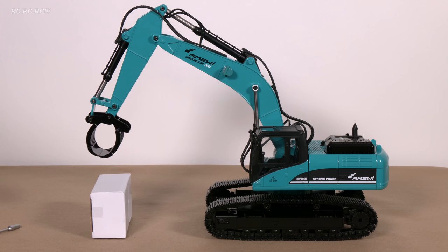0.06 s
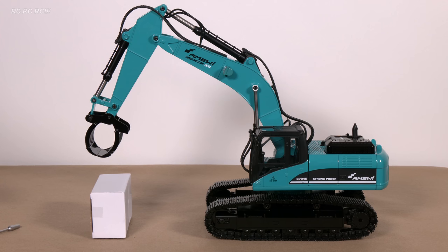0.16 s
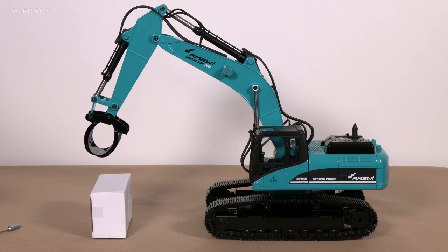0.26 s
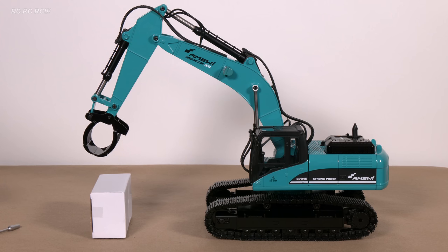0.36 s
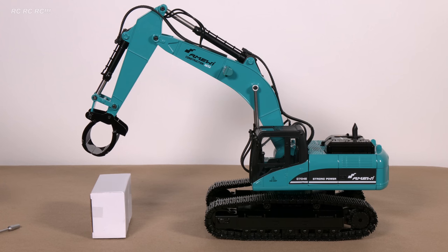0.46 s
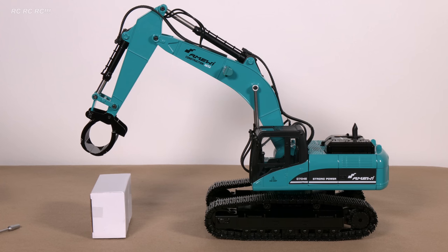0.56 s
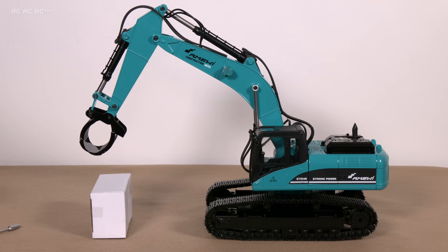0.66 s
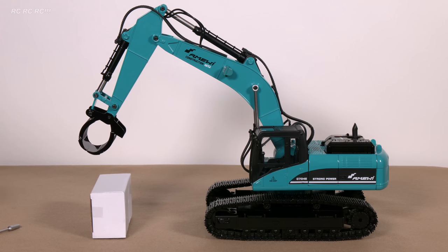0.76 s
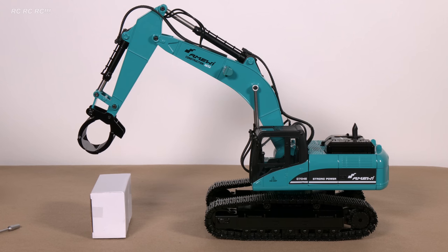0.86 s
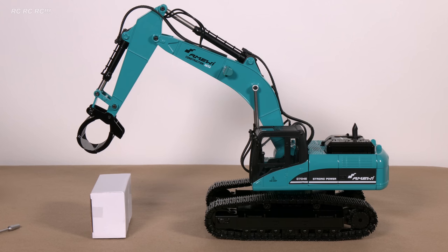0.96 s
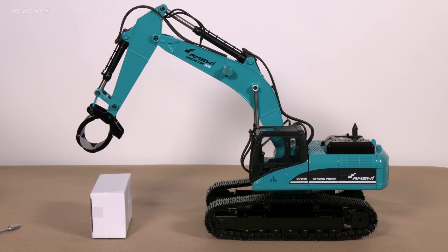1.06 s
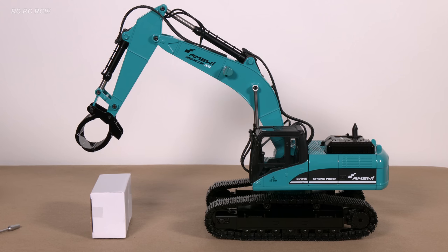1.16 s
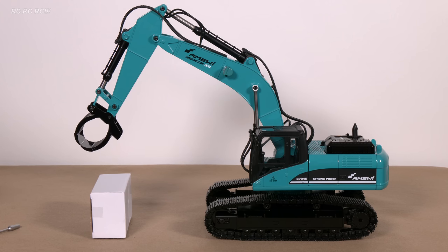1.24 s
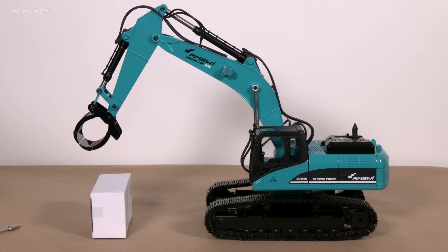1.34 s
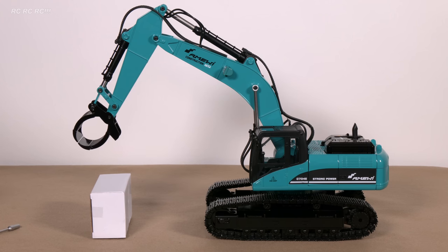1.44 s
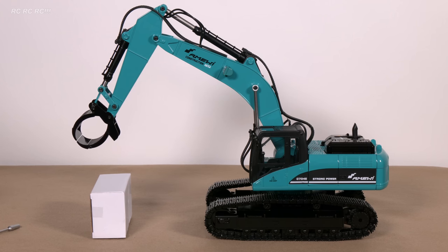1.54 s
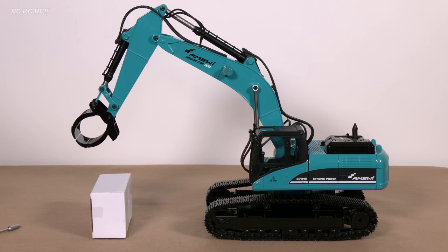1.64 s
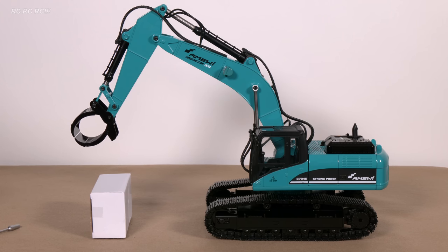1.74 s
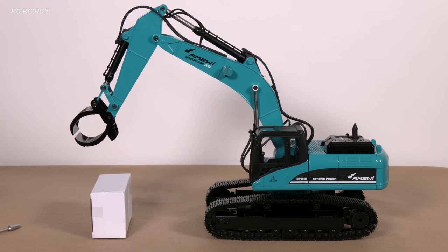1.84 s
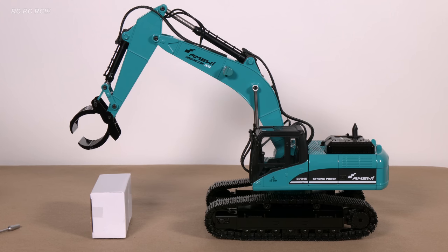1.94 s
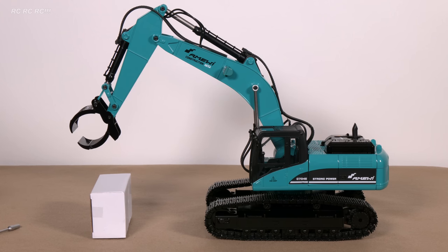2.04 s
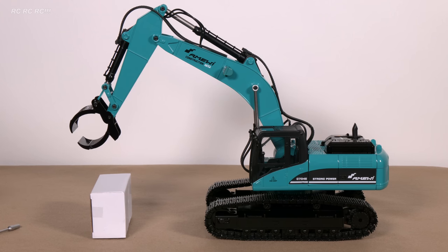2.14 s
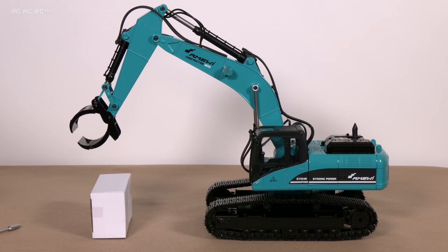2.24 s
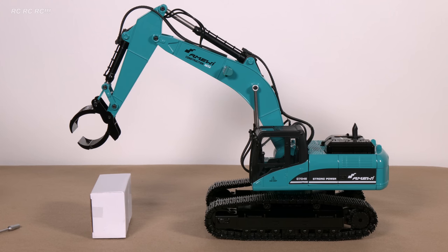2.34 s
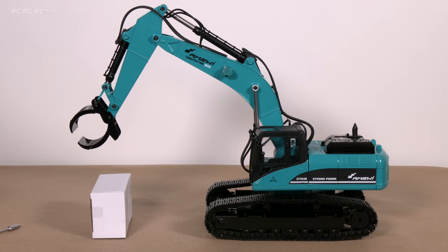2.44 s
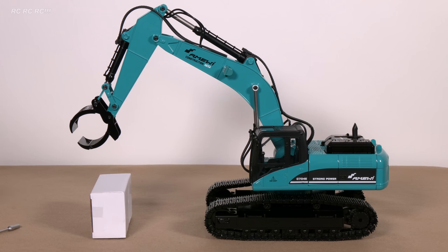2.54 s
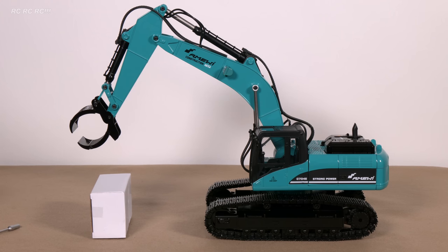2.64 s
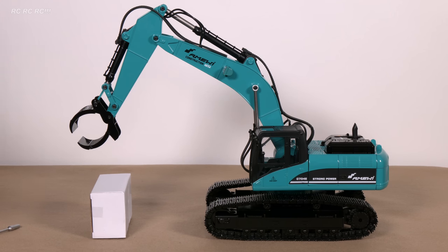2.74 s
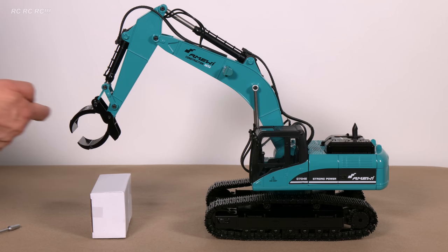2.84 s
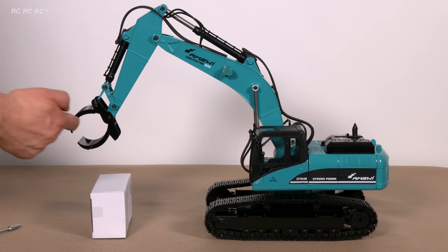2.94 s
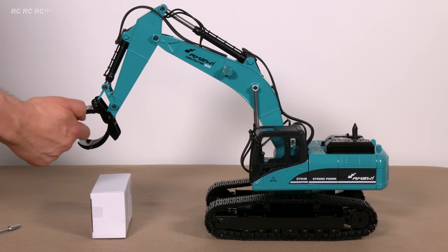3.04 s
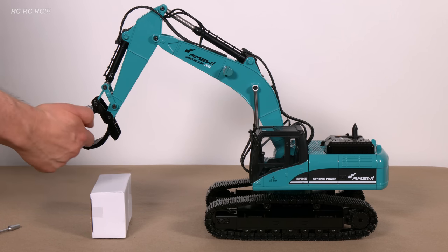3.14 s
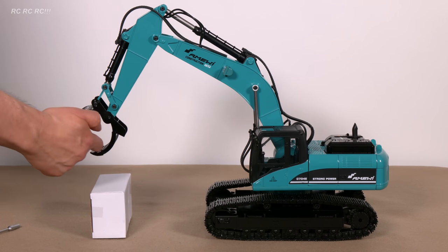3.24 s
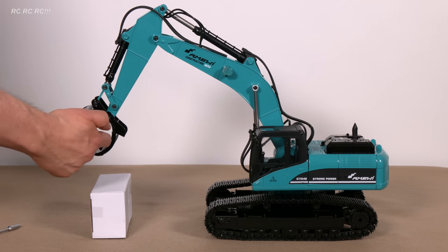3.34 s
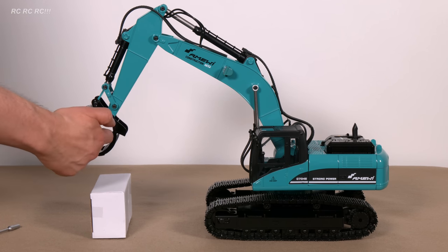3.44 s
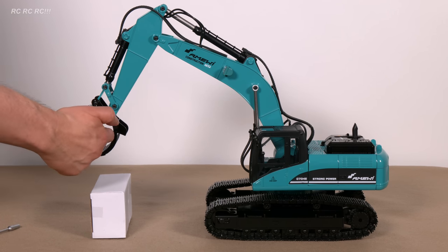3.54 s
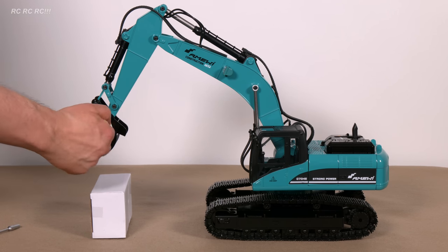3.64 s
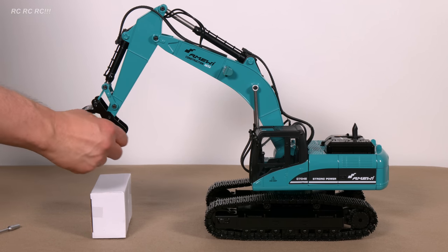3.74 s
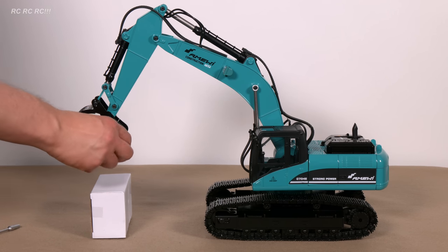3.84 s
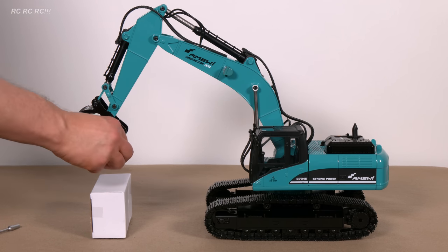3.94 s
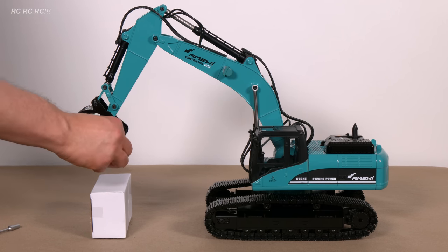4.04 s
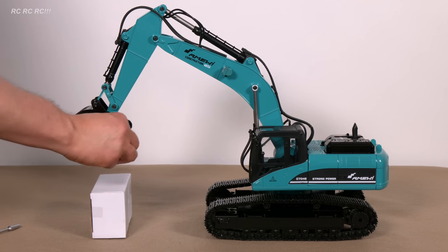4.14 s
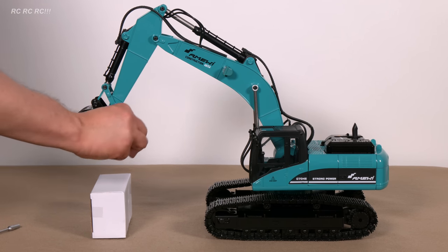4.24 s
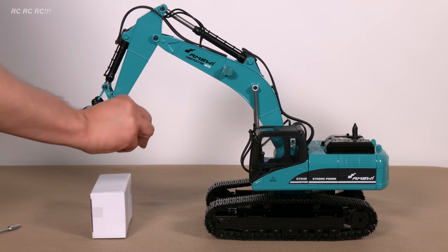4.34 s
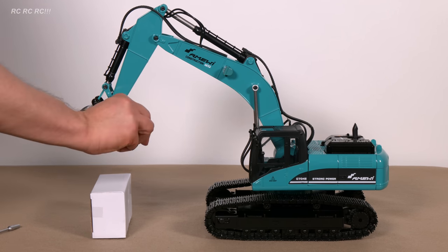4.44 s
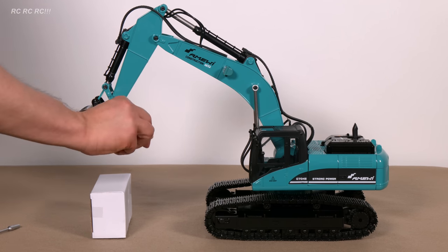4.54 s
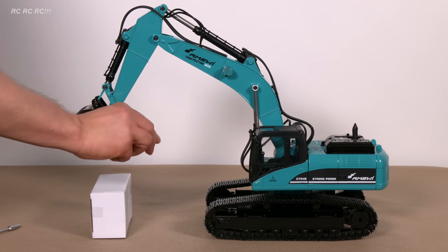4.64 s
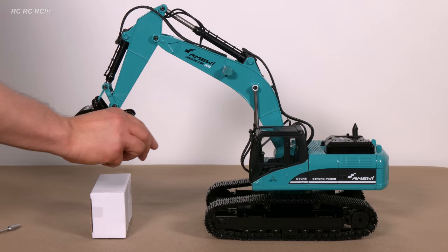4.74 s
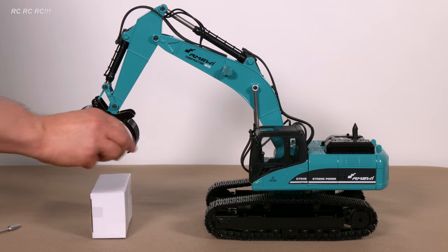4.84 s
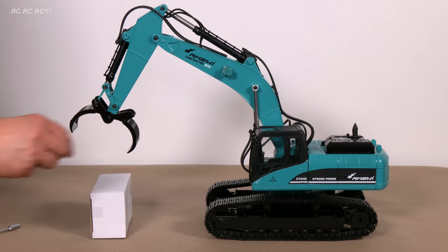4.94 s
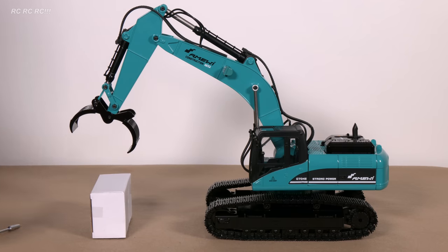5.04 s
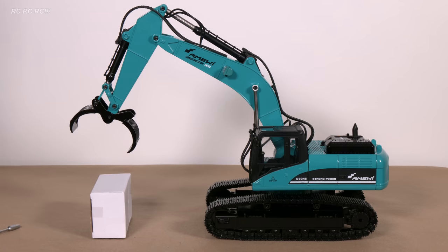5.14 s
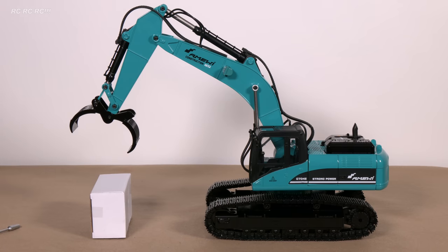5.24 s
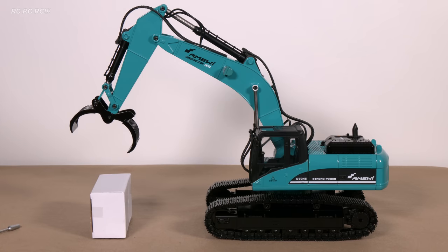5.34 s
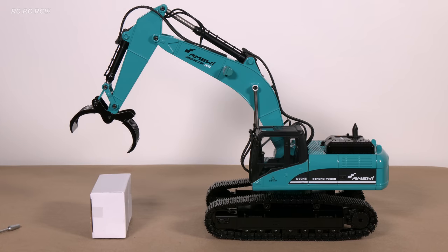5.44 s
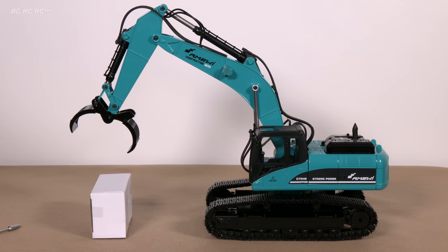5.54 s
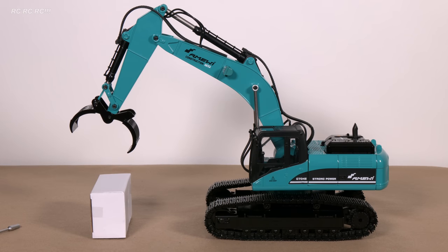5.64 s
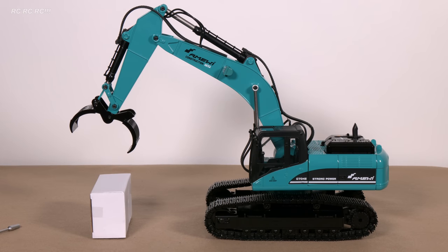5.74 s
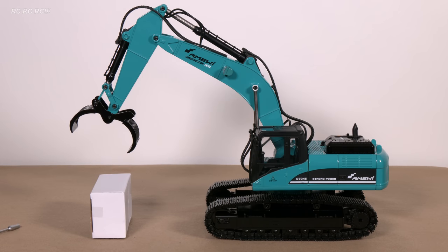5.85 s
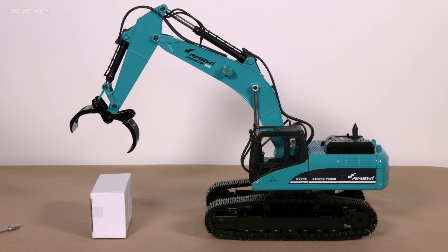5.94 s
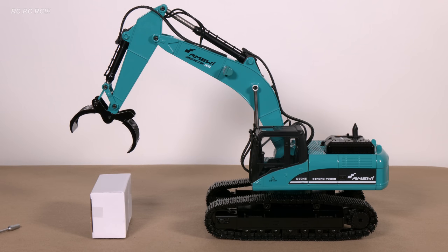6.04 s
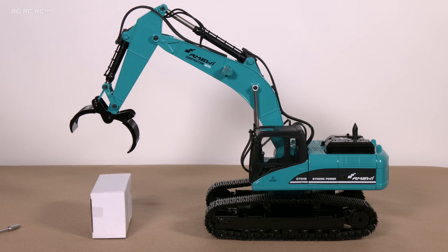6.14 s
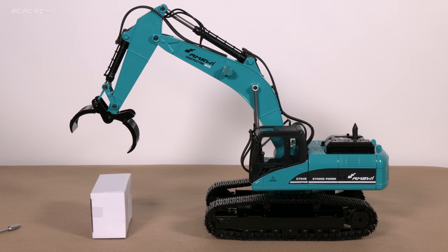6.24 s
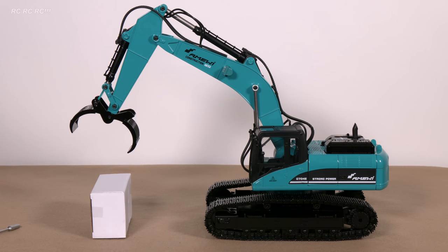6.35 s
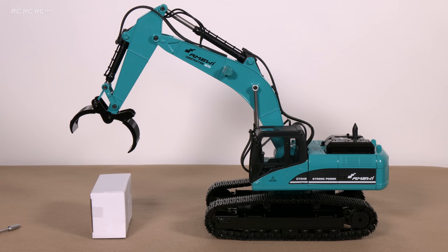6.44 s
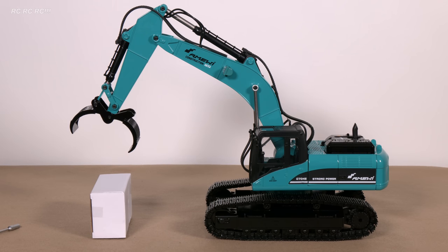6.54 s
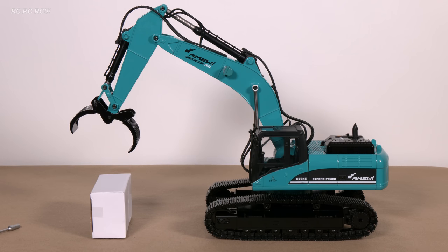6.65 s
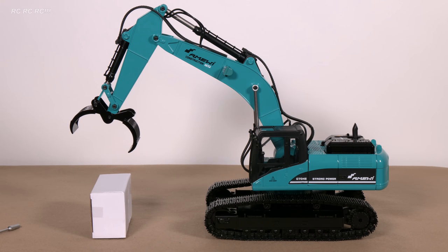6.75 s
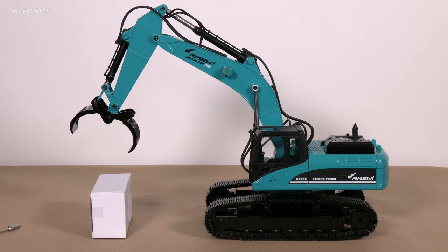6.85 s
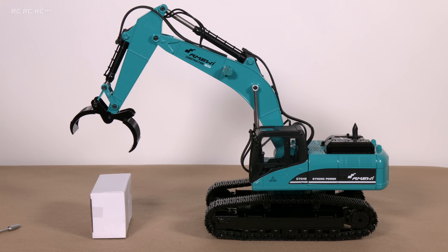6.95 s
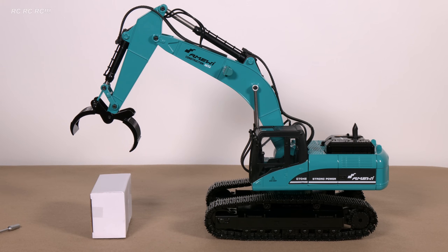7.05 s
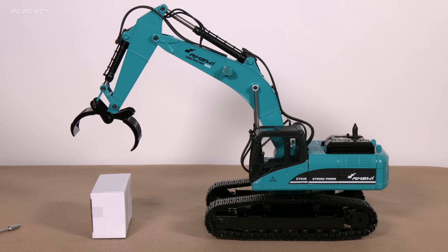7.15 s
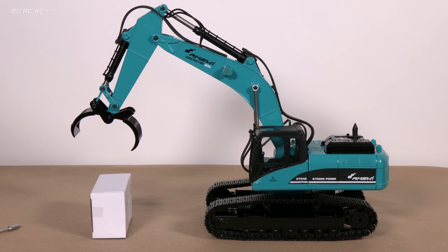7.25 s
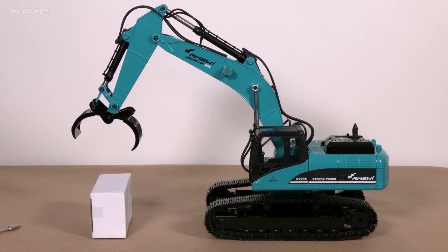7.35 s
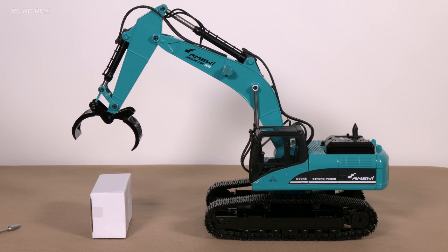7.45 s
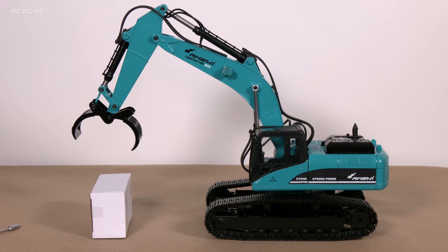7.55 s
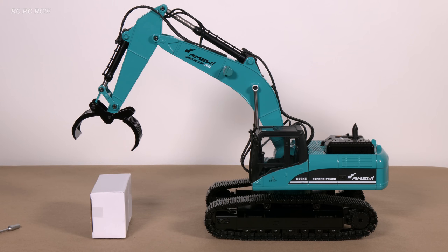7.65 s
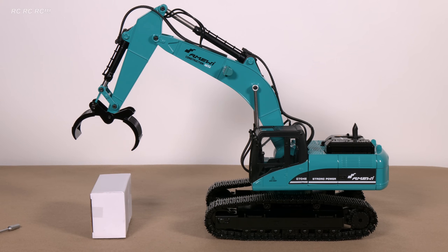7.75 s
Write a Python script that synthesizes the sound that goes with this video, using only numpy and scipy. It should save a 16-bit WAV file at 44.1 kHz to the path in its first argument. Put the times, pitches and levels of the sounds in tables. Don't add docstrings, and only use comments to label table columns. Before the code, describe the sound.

Toy excavator motor grinds for two seconds, a hand clicks its claw open with soft cloth rustle, then a faint buzz and short whirr.

```python
import sys
import numpy as np
from scipy import signal
from scipy.fft import rfft, irfft, next_fast_len
from scipy.io import wavfile
from scipy.ndimage import uniform_filter1d

SR = 44100
rng = np.random.default_rng(int(sys.argv[2]) if len(sys.argv) > 2 else 0)


def ratio_of_db(decibels):
    return 10 ** (np.asarray(decibels, float) / 20)


def persist_wave(psi):
    counts = np.round(np.clip(psi, -1, 1) * 32767).astype(np.int16)
    wavfile.write(sys.argv[1], SR, np.atleast_2d(counts).T)


N = 343539


def long_run():
    # on t/s, off t/s, first rattle level/dB, last rattle level/dB, spin-up t/s
    run = (-1, 2.05, -28.5, -28.5, .03)
    # t/s, f/Hz
    shaft = [(0, 309), (.5, 310.3), (1.1, 312), (2.06, 312.7), (2.16, 305)]
    # shaft level/dB at top speed, loss/(dB/Hz) below it, mesh whine level/dB, loss/(dB/Hz), extra coast fade
    tones_law = (-40, .7, -43, 1.9, -.25)
    teeth = [15, 18, 24, 28, 34, 35, 36, 38, 46, 48, 49, 50, 54, 58, 72, 73, 75, 80, 135, 220, 225, 240,
             245, 270, 315, 360, 365, 450, 495]
    teeth_db = [0, -19, -19, -17, -14, -14, -17, -9, -9, -6, -9, -9, -10, -13, -13, -13, -11, -12, 0, -8,
                -7, -6, -9, -9, -12, -12, -12, -17, -16]
    # f/Hz, level/dB per Hz
    colour = [(88, -59), (150, -43.5), (270, -17), (303, -17.5), (341, -13), (545, -14), (1020, -4.5),
              (1290, -11.5), (1530, -10), (2650, -12), (2810, -11), (3040, -8.5), (4580, -4.5), (8230, -9),
              (16000, -21.5)]
    # f/Hz, width/Hz, level/dB at the start, level/dB at the end
    rings = [(785, 55, 7, 7), (1000, 55, 9.5, 8), (1550, 110, 4.5, 8), (2660, 46, -6, 2),
             (3050, 140, -10, -8), (4570, 60, 7, 3), (4960, 100, 12, 1.5), (5140, 80, 1, -3),
             (5810, 260, 6.5, 4.5), (7530, 140, 4.5, 5.5), (8220, 250, 5.5, 8.5), (10800, 120, 3, 2)]
    return motor(run, shaft, tones_law, teeth, teeth_db, colour, rings,
                 swell_db=1.4, sizzle_db=.2, locked=0.46, throb=0.12, ticks_db=9.5,
                 waver_db=2.2, shake_hz=0.455, chatter_db=0.9)


def last_run():
    # on t/s, off t/s, first rattle level/dB, last rattle level/dB, spin-up t/s
    run = (6.96, 7.485, -32.5, -30.5, .022)
    # t/s, f/Hz
    shaft = [(6.955, 200), (7.08, 250), (7.16, 281), (7.24, 299), (7.3, 301), (7.36, 300.5), (7.4, 293),
             (7.48, 274), (7.57, 276)]
    # shaft level/dB at top speed, loss/(dB/Hz) below it, mesh whine level/dB, loss/(dB/Hz), extra coast fade
    tones_law = (-41, .35, -50.5, .8, -.3)
    teeth = [15, 38, 51, 270, 360, 540, 720, 767]
    teeth_db = [0, -6, -8, 0, 2, -3, -8, -14]
    # f/Hz, level/dB per Hz
    colour = [(88, -58), (150, -24), (209, -21), (291, -17), (328, -13), (391, -8), (624, -13), (745, -6),
              (1020, -4), (1360, -10), (1500, -8), (3100, -8.5), (8230, -7.5), (14800, -22), (16000, -31)]
    # f/Hz, width/Hz, level/dB at the start, level/dB at the end
    rings = [(750, 120, 3, 3), (1020, 45, 10, 9), (2190, 73, 8.4, 2.7), (2600, 200, 3.5, 3),
             (4650, 260, 4.1, 6.3), (5780, 270, 8.9, 4.3), (7900, 130, 4, 5)]
    return motor(run, shaft, tones_law, teeth, teeth_db, colour, rings,
                 swell_db=.6, sizzle_db=-1.1, locked=0.33, throb=0.074, ticks_db=17,
                 waver_db=4.5, shake_hz=1.84, chatter_db=1.1)


def nudge():
    # on t/s, off t/s, first rattle level/dB, last rattle level/dB, spin-up t/s
    run = (6.339, 6.59, -39.5, -38.5, .05)
    # t/s, f/Hz
    buzz = [(6.35, 787.8), (6.41, 782.3), (6.5, 781.5), (6.61, 788)]
    # buzz level/dB at top rate, loss/(dB/Hz) below it, upper tones level/dB, loss/(dB/Hz), extra coast fade
    tones_law = (-50, .01, -50, .01, 3.0)
    teeth = [7.5, 15, 22.5, 30, 37.5, 45, 52.5, 60, 67.5, 157.5, 165]
    teeth_db = [-8, 0, -7, -11, -12, -13, -12, -14, -14, -14, -14]
    # f/Hz, level/dB per Hz
    colour = [(88, -54), (150, -23), (383, -9.5), (431, -20), (494, -8), (612, -15), (790, -4), (871, -8.5),
              (1020, -4.5), (1290, -9), (4320, -12), (5910, -9), (16000, -35)]
    # f/Hz, width/Hz, level/dB at the start, level/dB at the end
    rings = [(1000, 42, 15.6, 8), (1540, 73, 8, 4.2), (2000, 96, 10, 3), (2480, 93, 11, 9.1),
             (3630, 110, 5, 5.7), (4660, 110, 6, 3), (5800, 140, 5, 11), (8020, 220, 8.1, 5.5)]
    return motor(run, buzz, tones_law, teeth, teeth_db, colour, rings,
                 swell_db=.1, sizzle_db=3.0, locked=0.23, throb=0.072, ticks_db=14,
                 waver_db=4.0, shake_hz=2.14, chatter_db=1.7)


def motor(run, shaft, tones_law, teeth, teeth_db, colour, rings, swell_db, sizzle_db, locked, throb,
          ticks_db, waver_db, shake_hz, chatter_db):
    on, off, first_db, last_db, spin_up = run
    coast_s = .16
    t = np.arange(max(on, 0), off + coast_s, 1 / SR)
    way = np.minimum((t - t[0]) / (off - t[0]), 1)
    coast_db = -250 * np.maximum(t - off, 0)
    slack_db = 20 * np.log10(1.001 - np.exp(-(t - on) / spin_up)) + coast_db
    noise_db = first_db + (last_db - first_db) * way + swell_db * np.sin(np.pi * way) + slack_db

    hz = np.interp(t, *np.transpose(shaft))
    below = np.where(t < off, hz.max() - hz, hz.max() - np.interp(off, t, hz))
    shaft_db, shaft_loss, mesh_db, mesh_loss, shaft_coast = tones_law
    tone_db = shaft_db - shaft_loss * below
    whine_db = mesh_db - mesh_loss * below
    turns = np.cumsum(uniform_filter1d(hz, size=1500) + shake_hz * drift(len(t), 14.1)) / SR

    phases = np.exp(2j * np.pi * rng.random(1025))
    flaws = irfft(phases / (1 + (np.arange(1025) / 192.0) ** 2))
    repeat = evened(np.interp(turns / 15 % 1 * 2048, np.arange(2048), flaws))
    beat = sum(np.cos(2 * np.pi * turns / k + k) for k in (1, 3, 5))

    ticks = np.clip(rng.standard_normal(len(t)), -1.6, 1.6) * (rng.random(len(t)) < 300 / SR)
    loose = rng.standard_normal(len(t)) * (1 + throb * beat) + ratio_of_db(ticks_db) * ticks
    loose = loose * ratio_of_db(chatter_db * drift(len(t), 45))

    source = loose + locked * repeat
    before = coloured(source, colour, [(f, w, d[0]) for f, w, *d in rings])
    after = coloured(source, colour, [(f, w, d[1]) for f, w, *d in rings])
    rattle = (1 - way) * before + way * after
    sizzle = signal.filtfilt(*signal.butter(2, 8000, "high", fs=SR), rattle)
    treble_db = np.maximum(sizzle_db + .8 * slack_db, -16)
    rattle = ratio_of_db(noise_db) * (rattle + sizzle * (ratio_of_db(treble_db) - 1))

    tones = np.zeros(len(t))
    for k, d in zip(teeth, teeth_db):
        base_db = tone_db if k < 135 else whine_db
        waver = waver_db * (k not in (15, 135)) * drift(len(t), 6)
        fade_db = slack_db + coast_db * (1.5 if k != 15 else shaft_coast)
        wave = np.sqrt(2) * np.sin(2 * np.pi * (k / 15 * turns + rng.random()))
        tones += ratio_of_db(base_db + d + fade_db + waver) * wave

    edge = np.minimum(1, (t[-1] - t) / 0.03)
    out = np.zeros((2, N))
    add(out[0], t[0], rattle * edge)
    add(out[1], t[0], tones * edge)
    return out


def grapple():
    # t/s, peak level/dB, knock level/dB re crack, brightness level/dB re crack
    clicks = [(2.724, -44, -16, -18), (2.737, -44, -16, -11), (3.241, -44, -2.5, -3), (3.398, -53, 10, -9),
              (3.434, -55, -2, -5), (3.682, -30.5, -5, -3), (3.715, -47, 5.5, -17), (3.894, -56, -12, -3),
              (3.904, -38.5, -8, -20), (3.92, -45, -3, -8), (4.104, -44, -14, -5), (4.132, -42, -8, -20),
              (4.143, -42, -21, -1.5), (4.155, -24, -8.5, -8), (4.184, -37, -11, -14),
              (4.208, -34.5, -4, -14), (4.248, -32.5, -14, -2.5), (4.422, -52, 2.5, -13),
              (4.452, -33.5, -3.5, -21), (4.471, -36, -12, -15), (4.636, -53, -6, -17),
              (4.68, -28.5, -13, -9), (4.692, -32.5, -9, -8), (4.71, -33, -16, -11), (4.737, -42, -5, -9),
              (5.353, -52, -8, -11), (5.657, -52, -9, -14), (5.813, -59, -9, 7), (5.838, -58, -7, -3)]
    # t/s, f/Hz, level/dB, 60 dB decay t/s
    pins = [(3.245, 6150, -73, .25), (3.395, 5730, -66, .15), (3.39, 5230, -70, .4), (3.53, 5230, -66, .25),
            (3.685, 5690, -70, .2), (3.895, 6150, -67, .7), (3.895, 5230, -73, .6), (4.7, 4990, -66.5, .9),
            (4.74, 6200, -68, .2)]
    out = np.zeros(N)
    t = np.arange(0, .15, 1 / SR)
    for s, db, knock_db, bright_db in clicks:
        hz = 1100 + (2050 - 1100) / (1 + np.exp((-45 - db - bright_db) / 3.0))
        t60 = max(.055 + .0025 * knock_db - .0035 * bright_db, .03)
        add(out, s, click(db, knock_db, bright_db, t60, hz))
    for s, hz, db, t60 in pins:
        edge = np.minimum(1, np.minimum(t / .004, (t[-1] - t) / .02))
        add(out, s, ratio_of_db(db - 60 * t / t60) * np.sin(2 * np.pi * hz * t) * edge)
    return out


def click(db, knock_db, bright_db, t60, hz):
    # f/Hz, level/dB, 60 dB decay t/s
    arm = [(403, 2.5, 0.068), (331, -2, 0.071), (535, -6, 0.037), (676, -13, 0.065), (822, -2, 0.056),
           (1020, -11, 0.054), (2050, -4, 0.019)]
    # f/Hz, width/Hz, level/dB
    jaw = [(1940, 95, 5), (2750, 150, 2.5), (3470, 240, 6), (7300, 500, 3.5), (10300, 640, 7)]
    t = np.arange(8000) / SR
    noise = rng.standard_normal((3, len(t)))
    decay_s = max(t60, .01)

    crack_colour = [(400, -30), (900, -6), (900 + hz, -6), (1800 + 3.9 * hz, -34), (16000, -55)]
    crack = coloured(noise[0], crack_colour, [(hz, 0.71 * hz, 8), *jaw])
    crack = dying(crack, ratio_of_db(-60 * t / decay_s))
    tick = coloured(noise[1], [(2500, -9), (4500, 1), (8000, 2), (10500, -9), (12500, -36)], jaw)
    tick = dying(tick, ratio_of_db(bright_db - 85 * t / decay_s))

    spread = rng.uniform(0.945, 1.026, len(arm))
    knock = sum(ratio_of_db(d - 60 * t / r) * np.sin(2 * np.pi * f * u * t) for (f, d, r), u in zip(arm, spread))
    panel = coloured(noise[2], [(180, -34), (320, -1), (500, -0.5), (900, -9), (1800, -45)])
    knock += panel * ratio_of_db(-4 - 60 * t / 0.11)
    knock *= np.minimum(1, t / 0.0036)

    rise = np.sin(np.pi / 2 * np.minimum(1, t / .0003 * ratio_of_db(bright_db))) ** 2
    return ratio_of_db(db - 7.5) * (rise * (crack + tick) + ratio_of_db(knock_db + 7.5) * knock)


def sleeve():
    # start t/s, peak t/s, level/dB, fade/(dB/s), brightness level/dB
    strokes = [(2.715, 2.73, -53, 300, -4), (2.71, 2.81, -59, 150, 5.5), (2.8, 2.962, -44, 135, 1.6),
               (4.88, 4.978, -63.5, 130, -1.1), (5.05, 5.3, -65, 100, 1.1), (5.325, 5.365, -50, 45, -3),
               (5.48, 5.63, -51.5, 140, 1.1), (5.7, 5.82, -61.5, 60, 2.5), (5.7, 6.04, -62, 160, 3)]
    # f/Hz, level/dB per Hz
    cloth = [(120, -53), (200, -19), (232, -2), (623, -8), (763, -1.5), (1450, -2), (1940, -4), (6520, -13),
             (16000, -25.5)]
    # f/Hz, width/Hz, level/dB
    folds = [(1280, 330, 3), (3270, 1300, 2), (6000, 1200, 2)]
    grains = rng.standard_normal(N) * ratio_of_db(1.7 * drift(N, 400))
    hiss = coloured(grains, cloth, folds)
    dull = signal.lfilter(*signal.butter(1, 2500, fs=SR), hiss)
    low = sum(stroke(*push) ** 2 for *push, bright_db in strokes)
    high = sum((stroke(*push) * ratio_of_db(2 * bright_db)) ** 2 for *push, bright_db in strokes)
    return np.sqrt(low) * dull + np.sqrt(high) * (hiss - dull)


def lean():
    # start t/s, peak t/s, level/dB, fade/(dB/s)
    pushes = [(2.5, 2.636, -59, 60), (2.7, 3.04, -61, 250), (3.15, 3.446, -62, 400), (3.55, 3.9, -65, 150),
              (3.95, 4.08, -66, 17)]
    rumble_colour = [(30, -34), (60, -13), (110, -5), (200, -12), (350, -32), (1000, -70)]
    rumble = coloured(rng.standard_normal(N), rumble_colour)
    return rumble * sum(stroke(*push) for push in pushes)


def echoes(x):
    # f/Hz, 60 dB decay t/s
    room = [(250, .38), (700, .34), (2000, .33), (5000, .28), (12000, .25)]
    taps = np.zeros(SR // 2)
    at = np.arange(300, len(taps) - 20, 20)
    taps[at + rng.integers(0, 20, len(at))] = rng.choice([-1., 1.], len(at))
    hz, t, z = signal.stft(taps, SR, nperseg=256)
    decay = ratio_of_db(-60 * t / read(room, hz)[:, None])
    tail = signal.istft(z * decay, SR, nperseg=256)[1]
    return signal.fftconvolve(x, tail / np.linalg.norm(tail))[:N]


def quiet_room():
    # f/Hz, level/dB per Hz
    quiet = [(15, -52), (25, -18.5), (76, -11), (108, -9), (170, -10), (242, -8.5), (344, -10.5),
             (451, -13), (503, -6.5), (545, -11.5), (754, -13), (818, -22), (887, -20), (1400, -26),
             (16000, -37)]
    # f/Hz, width/Hz, level/dB
    drones = [(299, 11, -67), (392.3, 7.3, -68), (494, 29, -61.5), (747, 42, -73)]
    size = next_fast_len(N)
    t = np.arange(N) / SR
    hz = np.fft.rfftfreq(size, 1 / SR)
    out = ratio_of_db(-57) * coloured(rng.standard_normal(N), quiet)
    for f, width, db in drones:
        band = rfft(rng.standard_normal(size)) / (1 + (2 * (hz - f) / width) ** 2)
        out += ratio_of_db(db) * evened(irfft(band, size)[:N])
    hum = np.sqrt(2) * np.sin(2 * np.pi * 50.3 * t)
    return out + ratio_of_db(-68 + 1.5 * drift(N, 4)) * hum


def stroke(start, peak, db, fade_db):
    t = np.arange(N, dtype=np.float32) / SR
    swell = np.clip((t - start) / max(peak - start, .002), 0, 1) ** 1.5
    return swell * ratio_of_db(db - fade_db * np.maximum(t - peak, 0))


def dying(noise, fall):
    return noise * fall * np.linalg.norm(fall) / np.linalg.norm(noise * fall)


def coloured(x, colour, rings=()):
    size = next_fast_len(len(x))
    hz = np.fft.rfftfreq(size, 1 / SR)
    db = read(colour, hz) + sum(d / (1 + (2 * (hz - f) / w) ** 2) for f, w, d in rings)
    return evened(irfft(rfft(x, size) * ratio_of_db(db), size)[:len(x)])


def drift(size, hz):
    pole = [1, -np.exp(-2 * np.pi * hz / SR)]
    once = signal.lfilter([1], pole, rng.standard_normal(size))
    return evened(signal.lfilter([1], pole, once))


def evened(x):
    return x / np.sqrt(np.mean(x ** 2) + 1e-20)


def read(points, hz):
    f, value = np.transpose(points)
    return np.interp(np.log(hz + 1), np.log(f + 1), value)


def add(mix, s, sound):
    part = mix[round(s * SR):][:len(sound)]
    part += sound[:len(part)]


def scene():
    rattle, tones = long_run() + nudge() + last_run()
    near = rattle + grapple()
    direct = ratio_of_db(-.7) * near + tones
    reflected = ratio_of_db(-7) * echoes(near + 0.3 * tones)
    return (direct + reflected + sleeve() + lean() + quiet_room())[None]


def roll_off(x):
    return signal.sosfilt(signal.butter(12, 16260, fs=SR, output="sos"), x)


def record(dry):
    lowpass = signal.firwin(801, 15730, window=("kaiser", 9), fs=SR)
    dull = signal.oaconvolve(dry, lowpass[None], "same")
    return roll_off(dull)


dry = scene()
out = record(dry)
persist_wave(out)
```